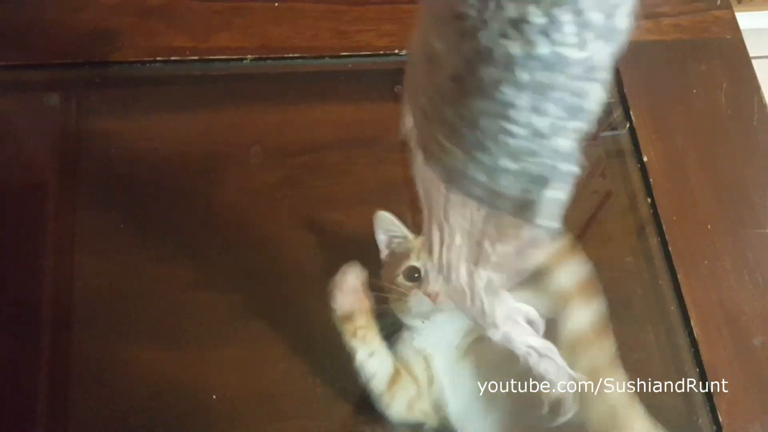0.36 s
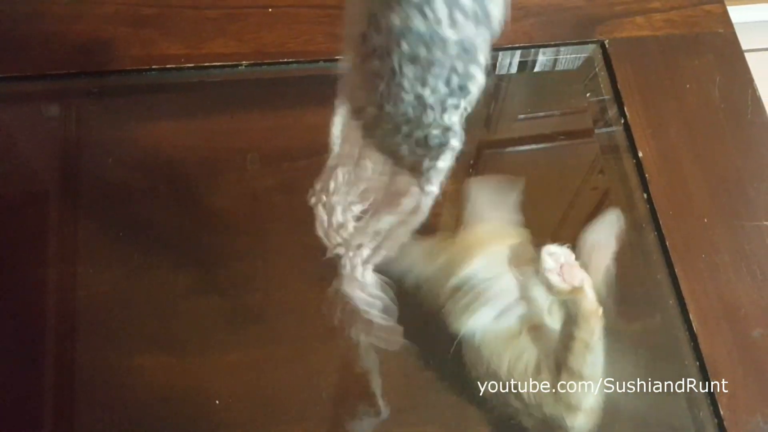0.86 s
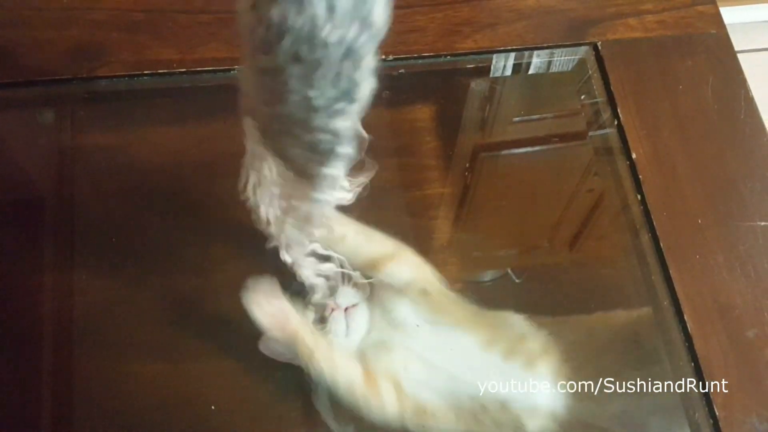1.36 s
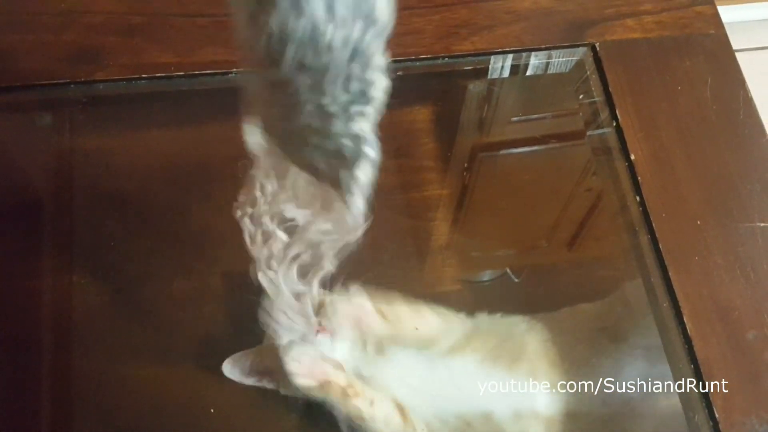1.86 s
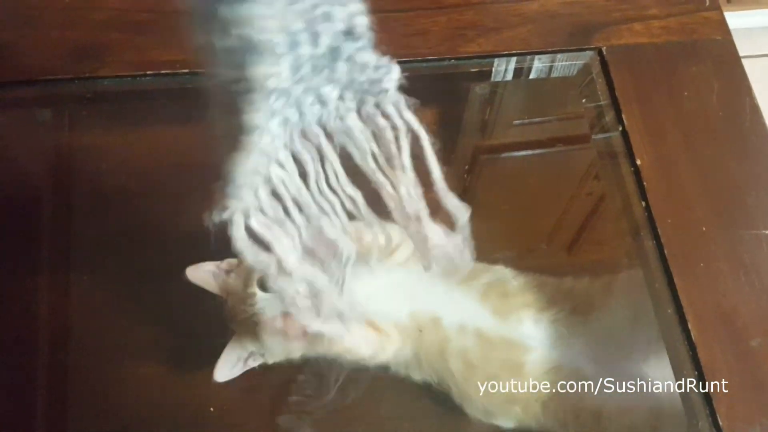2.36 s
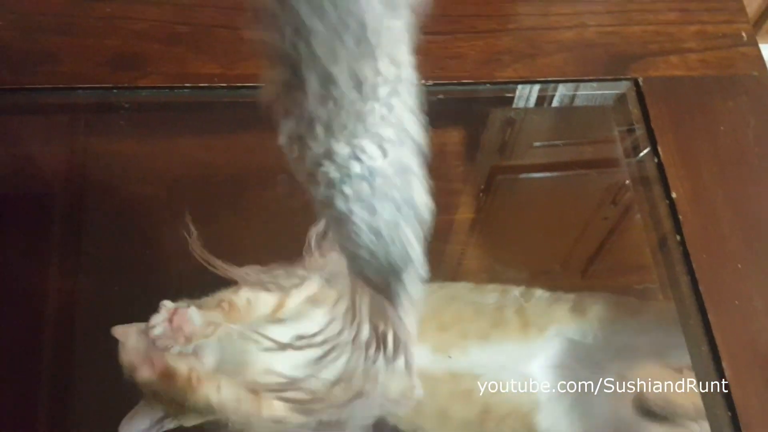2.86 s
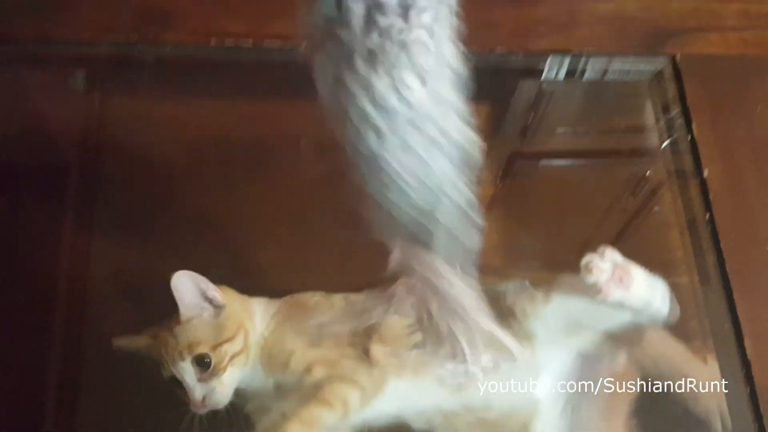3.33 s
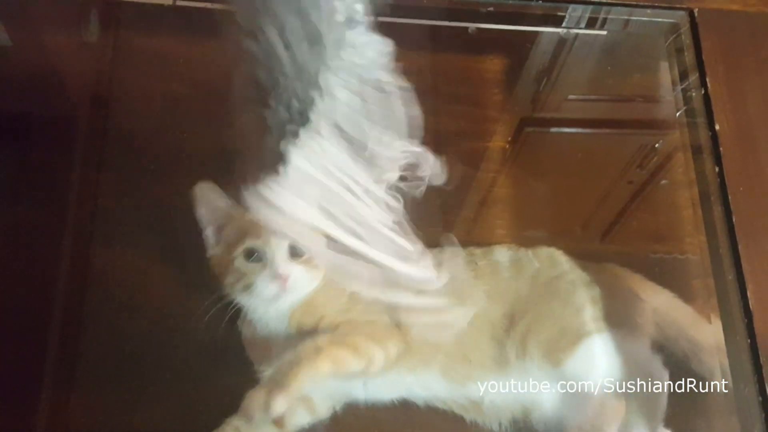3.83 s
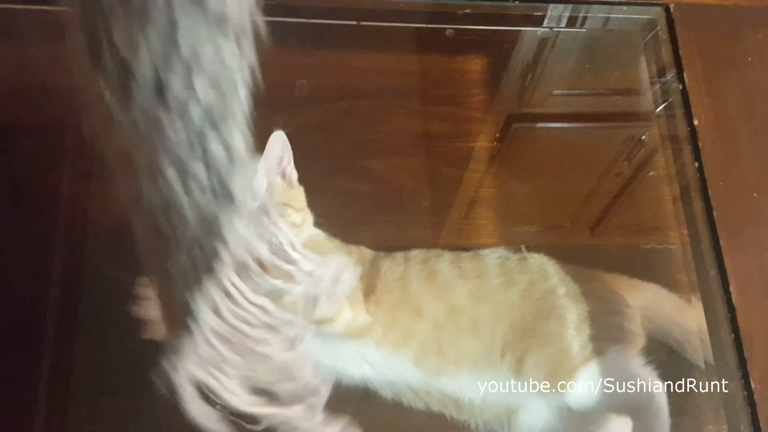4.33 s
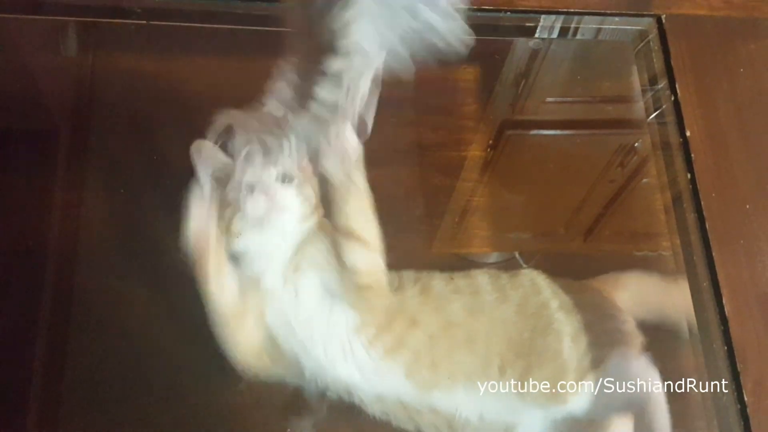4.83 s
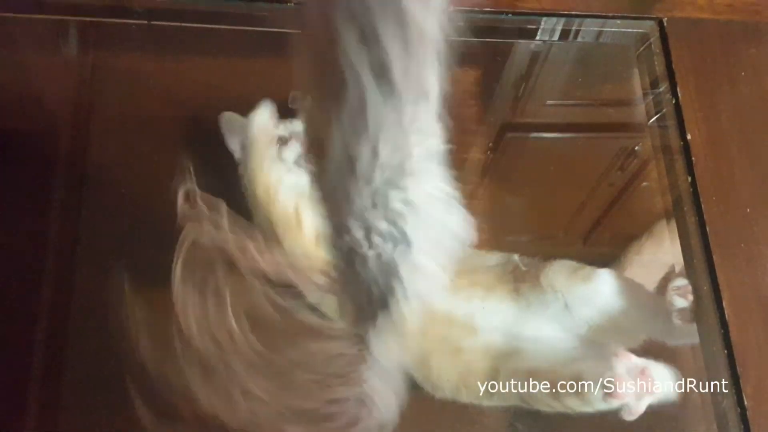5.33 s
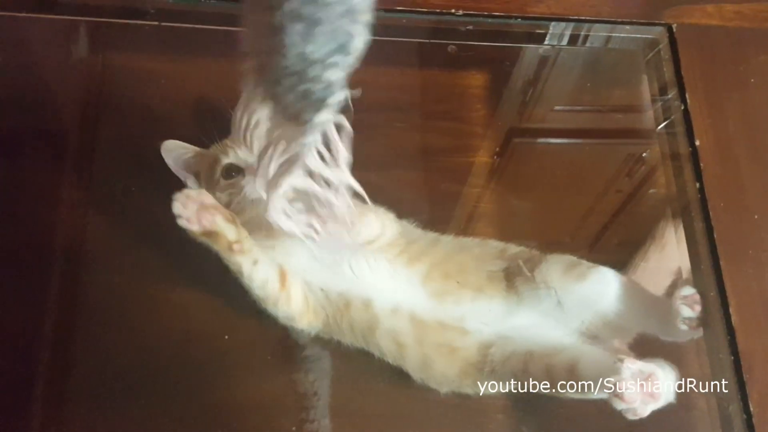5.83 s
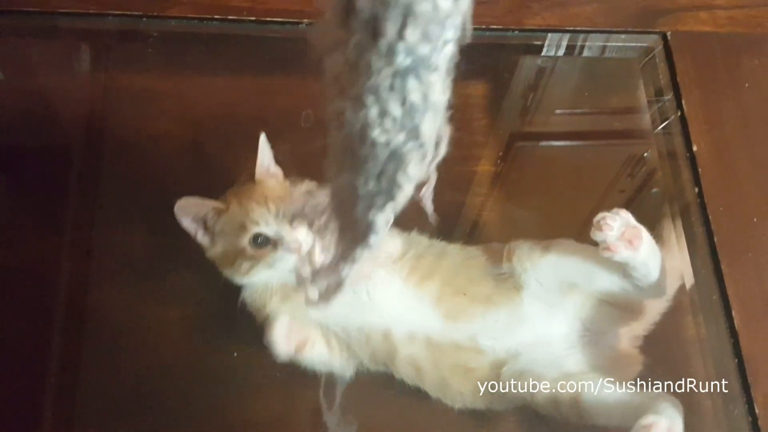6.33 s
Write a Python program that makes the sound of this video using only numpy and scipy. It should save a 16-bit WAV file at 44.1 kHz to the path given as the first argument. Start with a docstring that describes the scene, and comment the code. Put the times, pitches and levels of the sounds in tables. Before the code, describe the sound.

In a quiet indoor room, a kitten's paws and claws play against a wood-framed glass tabletop. Faint taps lead to one loud hollow thump with bright clatter, then a run of lighter knocks, scrapes and fur or wool scuffs. After about two and a half seconds only sparse soft bumps remain over low room hum. A close hand-held stereo microphone adds deep rumble and late dry finger ticks.

```python
"""Kitten paws thump the frame and glass pane of a wooden table: low modes swell, ring and echo briefly. Claws
and pads tap the glass: noise cracks, clattering modes, clear pane rings and a diffuse tail. Fur and wool brush
along as grainy noise, and sliding claws wake short high rings. A quiet room hums behind: coloured noise, a
narrow hum band and hiss. A hand-held recorder with two microphones adds deep handling rumble and, late on, dry
finger ticks and rubs."""
import sys
import numpy as np
from scipy import signal
from scipy.io import wavfile

SR = 44100
rng = np.random.default_rng(int(sys.argv[2]) if len(sys.argv) > 2 else 0)


def rack_gain(trim_db):
    """Turn a fader trim in dB into the linear factor to multiply a signal by."""
    fader = np.asarray(trim_db, float)
    return 10 ** (fader / 20)


def file_out(sig):
    """Save sig as 16-bit WAV at sys.argv[1]."""
    # one column per channel
    cols = np.atleast_2d(sig).T
    # limit, then scale
    lim = np.clip(cols, -1, 1)
    pcm = np.round(lim * 32767).astype(np.int16)
    wavfile.write(sys.argv[1], SR, pcm)


N = 283871   # samples


def rms_one(x):
    """Scale to unit rms."""
    return x / np.sqrt(np.mean(x ** 2) + 1e-20)


def at_hz(points, hz):
    """Read a curve of (frequency [Hz], value) on a log-frequency axis, flat beyond its ends."""
    curve_hz, value = np.transpose(points)
    return np.interp(np.log(hz), np.log(curve_hz), value)


def clicks(s, heights):
    """A train of single-sample pushes."""
    out = np.full(N, 1e-18)
    out[np.round(np.asarray(s) * SR).astype(int)] = heights
    return out


def ring(x, hz, t60):
    """A two-pole resonator: a unit push sets a sine of height 1 ringing, down 60 dB after t60."""
    r, w = rack_gain(-60 / (t60 * SR)), 2 * np.pi * hz / SR
    return signal.lfilter([0, np.sin(w)], [1, -2 * r * np.cos(w), r * r], x)


def dying(x, t60):
    """Each push jumps up and decays 60 dB in t60."""
    return signal.lfilter([1], [1, -rack_gain(-60 / (t60 * SR))], x)


def band(x, low, high):
    """Butterworth band-pass."""
    return signal.sosfilt(signal.butter(2, [low, high], "band", fs=SR, output="sos"), x)


def drift(rate):
    """Slow random wander of unit rms: noise at a fortieth of SR through two poles at rate [Hz]."""
    r = np.exp(-80 * np.pi * rate / SR)
    noise = rng.standard_normal(N // 40 + 2002)
    slow = signal.lfilter([1], [1, -2 * r, r * r], noise)[2000:]   # drop the filter's settling
    return np.interp(np.arange(N) / 40, np.arange(len(slow)), rms_one(slow))


def favour_db(hz, centre_hz, db_per_octave):
    """Level falls (or rises, if negative) per octave away from the pitch the struck spot favours."""
    return -db_per_octave * np.abs(np.log2(hz / centre_hz))


def late_right(pair):
    """The sound reaches the right microphone 0.33 ms later."""
    n = np.arange(N)
    return np.array([pair[0], np.interp(n - 0.00033 * SR, n, pair[1])])


def shadowed(pair, pan_db=-5.5, corner_hz=800):
    """The casing shades the left microphone: above a corner, left against right shifts by pan_db."""
    low = signal.sosfilt(signal.butter(1, corner_hz, fs=SR, output="sos"), pair)
    return low + (pair - low) * rack_gain(np.array([[pan_db], [-pan_db]]) / 2)


def swells(s, rise, fall, db):
    """Each row climbs to its level and dies away, 20 dB per rise or fall time."""
    t, out = np.arange(N) / SR, np.zeros(N)
    for at, up, down, level_db in zip(s, rise, fall, db):
        near = slice(max(int((at - 3 * up) * SR), 0), int((at + 3 * down) * SR))
        away = np.maximum((at - t[near]) / up, (t[near] - at) / down)
        out[near] += rack_gain(level_db - 20 * away)
    return out


EDGES = 21 * 2 ** np.arange(0, 9.7, .4)   # noise band edges [Hz], 0.4 octave apart
HIGH_BANDS = list(zip(EDGES[11:], EDGES[12:]))   # bands above about 440 Hz
# colour of the room noise: (frequency [Hz], relative level [dB per Hz])
ROOM_COLOUR = [(15, -47), (25, -33), (49, -19), (92, -21), (108, 1), (166, -6), (195, -4.5), (242, -3.5),
               (373, -1.5), (607, -13.5), (1070, -13.5), (1290, -21), (2050, -25.5), (6210, -42),
               (16000, -45.5)]
# how alike left and right are, values below 0 played as 0: (frequency [Hz], likeness [-1 to 1])
ROOM_LIKENESS = [(60, 0.58), (180, 0.97), (550, 0.72), (1650, -0.58), (4970, -0.06), (15000, -0.05)]


def room_tone():
    """Distant ventilation and hiss, alike on both sides in the bass, with a wavering hum."""
    noise, white = 0, rng.standard_normal((2, 2, N))
    for k, (low, high) in enumerate(zip(EDGES, EDGES[1:])):
        hz = np.sqrt(low * high)
        mid, side = band(white[k % 2], low, high)
        alike = np.clip(at_hz(ROOM_LIKENESS, hz), 0, 1)
        gain = rack_gain(at_hz(ROOM_COLOUR, hz) + 0.22 * drift(4.8))
        noise = noise + gain * (np.sqrt(1 + alike) * mid + np.sqrt(1 - alike) * side * [[1], [-1]])
    hum_hz, hum_width_hz = 119, 5.5
    hum = band(rng.standard_normal(N), hum_hz - hum_width_hz / 2, hum_hz + hum_width_hz / 2)
    hiss = band(rng.standard_normal((2, N)), 12800, 17400)   # the microphones' own noise peaks high up
    return rack_gain(-50.5) * rms_one(noise) + rack_gain(-62) * rms_one(hum) + rack_gain(-79.5) * rms_one(hiss)


# deep rumble in the casing as the holding hand shifts: (time [s], level [dB])
HAND_RUMBLE = [(0.0, -80), (0.07, -57.5), (0.62, -55), (0.9, -51), (0.95, -54.5), (1.65, -61), (1.66, -58),
               (1.95, -62), (2.0, -47), (2.17, -68), (3.19, -72), (3.26, -52), (3.71, -70), (4.94, -77),
               (5.48, -61), (6.43, -72)]


def hand():
    """Lumpy deep rumble through the casing: low noise with a wandering level, alike on both sides."""
    s, db = np.transpose(HAND_RUMBLE)
    lumps = band(rng.standard_normal(N), 28, 80) * rack_gain(1.5 * drift(8))
    return rack_gain(np.interp(np.arange(N) / SR, s, db)) * rms_one(lumps)


TAP_CHANCE_DB = 1.5   # spread of each band and ring from tap to tap
# claw and pad taps, knock and edge against the tap's own level:
# (time [s], level [dB], dull knock [dB], bright edge [dB], favoured ring [Hz])
CLAW_TAPS = [(0.0114, -43.5, -23, -3, 3400), (0.1792, -43.5, 0, -5, 1030), (0.237, -52, -8, -4, 3630),
             (0.4376, -42, -11, -2, 1940), (0.5704, -45.5, -23, -6, 3300), (0.7455, -37.5, 3, -9, 1450),
             (0.7674, -21, -7, -6.5, 1190), (0.836, -22, 12, -5.5, 1600), (0.9185, -24, -22, -31, 2480),
             (0.972, -39, -25, -4, 2580), (1.06, -39, -12, -14.5, 2330), (1.0925, -21.5, -18.5, -15, 1920),
             (1.2393, -32.5, 9.5, -10, 2750), (1.2702, -32, -26, -15, 1060), (1.4232, -25.5, -14, -8, 1040),
             (1.4325, -33.5, 0, -17, 1040), (1.5868, -30, -9, -7.5, 2340), (1.614, -44.5, -12, -6, 2370),
             (1.6769, -25.5, 2.5, -11.5, 1770), (1.6859, -41.5, 6.5, -31, 1030),
             (1.9968, -26, -6.5, -13, 2180), (2.085, -34, 0, -7, 1930), (2.137, -34, -7.5, -33, 1010),
             (2.377, -36, -10, -13.5, 2850), (2.74, -45, -2.5, -9, 970), (3.233, -54, -6, -2, 1070),
             (4.1758, -46, 5, -25, 1780), (4.352, -41, 0, -21, 1390), (4.9065, -41, 0, -4.5, 1860),
             (5.4212, -40.5, 2, -11, 2750), (5.679, -71, -3, -19, 1500)]
# where the knock, main, edge and treble levels of a tap apply: (frequency [Hz])
TAP_COLOUR_HZ = [750, 2000, 4700, 9000]


def tap_colour_db(hz):
    """Level of every tap at one pitch: its colour, less the distance from the ring its spot favours."""
    _, db, dull_db, edge_db, ring_hz = np.transpose(CLAW_TAPS)
    treble_db = edge_db + 4.1
    levels = db[:, None] + np.transpose([dull_db, 0 * db, edge_db, treble_db])
    colour = [at_hz(np.transpose([TAP_COLOUR_HZ, row]), hz) for row in levels]
    return np.array(colour) + favour_db(hz, ring_hz, 5.4)


# decay of the diffuse tap tail: (frequency [Hz], t60 [s])
TAIL_T60 = [(500, 0.65), (1500, 0.32), (4000, 0.35), (8000, 0.14), (15000, 0.16)]


def crack_and_tail(s):
    """Banded noise: a crack of a few ms, alike on both sides, and a longer tail of its own on each."""
    crack, tail = rng.standard_normal((2, N)), rng.standard_normal((2, 2, N))
    direct, diffuse = 0, 0
    for k, (low, high) in enumerate(HIGH_BANDS):
        hz = np.sqrt(low * high)
        luck_db = TAP_CHANCE_DB * rng.standard_normal(len(s))
        push = clicks(s, rack_gain(tap_colour_db(hz) - 0.74 * np.log2(hz / 2000) + luck_db))
        burst = dying(push, 0.0067 * (2000 / hz) ** 0.053) * crack[k % 2]
        direct = direct + band(rack_gain(12.5) * burst, low, high)
        direct = direct + band(rack_gain(-9) * push, low, high)   # the sharp edge of first contact
        wash = dying(push, at_hz(TAIL_T60, hz)) * tail[k % 2]
        diffuse = diffuse + band(rack_gain(-1.5) * wash, low, high)
    return direct, diffuse


# clear rings of the pane: (frequency [Hz], relative level [dB], t60 [s])
PANE_RINGS = [(1042, 7, 0.15), (1133, 4, 0.29), (1390, -1.5, 0.37), (1800, -1, 0.11), (1930, -7, 0.2),
              (2324, -1, 0.14), (2450, -7, 0.21), (2750, -0.5, 0.15), (4020, 10, 0.06), (4710, 20, 0.048)]


def pane_rings(s, ring_hz):
    """The glass sings at its clear modes, most at the favoured ring of each tap and its octave."""
    out = 0
    for hz, mode_db, t60 in PANE_RINGS:
        near_db = np.maximum(favour_db(hz, ring_hz, 26), favour_db(hz, 2 * ring_hz, 28))
        luck_db = TAP_CHANCE_DB * rng.standard_normal(len(s))
        level_db = tap_colour_db(hz) + mode_db - 7.5 + near_db + luck_db
        out = out + ring(clicks(s, rack_gain(level_db)), hz, t60)
    return out


def clatter(s, count=48):
    """Close modes, each reaching each microphone with its own size and sign."""
    out = 0
    for hz in np.geomspace(480, 7000, count) * rng.uniform(1.0, 1.02, count):
        swing = rng.standard_normal((2, len(s)))
        push = np.array([clicks(s, rack_gain(tap_colour_db(hz) - 13.5) * side) for side in swing])
        out = out + ring(push, hz, 0.31 * at_hz(TAIL_T60, hz))
    return out


def taps():
    """Hard contacts on glass: a short crack, clattering modes, clear rings and a diffuse tail."""
    s, *_, ring_hz = np.transpose(CLAW_TAPS)
    crack, tail = crack_and_tail(s)
    direct = crack + pane_rings(s, ring_hz)
    return shadowed(late_right([direct, direct]) + tail + clatter(s))


# soft paw blows; the fall is per octave away from the favoured pitch, the ring time scales the modes' t60:
# (time [s], level [dB], favoured pitch [Hz], fall [dB per octave], ring time [times])
PAW_BLOWS = [(0.038, -27.5, 215, 20.5, 1.07), (0.249, -38.5, 230, 16, 1.8), (.44, -45, 131, 0.5, 2.8),
             (0.767, -27.5, 312, 6, 1.3), (0.8345, -3, 235, 11.5, 0.68), (.852, -13, 560, 28, 1.4),
             (.866, -7, 160, 9.5, 0.55), (.895, -13, 239, 8, 0.19), (.918, -19.5, 142, 5, 0.78),
             (1.013, -26.5, 170, 12.5, 0.55), (1.089, -34, 125, 2.5, 1.27), (1.233, -36.5, 235, 11.5, 2.9),
             (1.423, -33, 402, 35, 1.7), (1.461, -31.5, 121, 9, 1.26), (1.579, -30.5, 204, 16, 1),
             (1.673, -29.5, 211, 11.5, 1.43), (1.996, -36, 308, 4, 0.98), (2.028, -37, 119, 18, 1.6),
             (2.087, -37.5, 231, 15, 3.2), (2.14, -38, 120, 11, 0.82), (2.378, -67.5, 400, -13, 0.92),
             (2.742, -44, 129, 15, 1.2), (3.237, -37.5, 160, 19, 2.8), (3.308, -35.5, 120, 13, 1.6),
             (3.392, -38.5, 121, 20, 0.8), (4.905, -45, 300, 2, 0.45), (5.4, -41.5, 150, 7, 0.73)]
# low modes of pane and frame: (frequency [Hz], relative level [dB], t60 [s])
TABLE_MODES = [(91.7, -6, 0.39), (118.8, 4.5, 0.31), (160, 1.5, 0.31), (167, -20.5, 0.31),
               (195.6, -12.5, 0.57), (226.94, -1.5, 0.33), (242.2, -0.5, 0.18), (286, -20.5, 0.49),
               (300.2, -3, 0.16), (315.3, 1, 0.12), (354.2, 3, 0.11), (393, -7.5, 0.15), (402, 4, .18),
               (433, -4, 0.34), (492, -6.5, 0.23), (571, -6.5, 0.1), (606, -6.5, 0.15), (678, -7.5, 0.3),
               (702, -14.5, 0.16), (885, -1, 0.17)]


def thumps():
    """A soft pad drives the low modes; the heavy frame is slow to follow, so the deepest swell late."""
    hz, mode_db, t60 = np.transpose(TABLE_MODES)[:, :, None]
    t, out = np.arange(SR // 2) / SR, np.zeros(N + SR)
    swell = 1 - np.exp(-t / (0.0082 * (120 / hz) ** 2))   # 8.2 ms at 120 Hz
    chance_db = rng.standard_normal((len(PAW_BLOWS), len(TABLE_MODES), 1))
    for (s, db, spot_hz, fall_db, ring_times), luck_db in zip(PAW_BLOWS, chance_db):
        start_db = db + mode_db - 4 + favour_db(hz, spot_hz, fall_db) + luck_db
        level_db = start_db - 60 * t / (ring_times * t60)
        at = round(s * SR)
        out[at:at + len(t)] += np.sum(swell * rack_gain(level_db) * np.sin(2 * np.pi * hz * t), axis=0)
    soft = signal.lfilter([.15], [1, -.85], out[:N])
    # a small pane radiates no deep bass
    return signal.sosfilt(signal.butter(4, 88, "high", fs=SR, output="sos"), soft)


def echoes(x, t60=0.17, wall_hz=900):
    """Room echoes: six feedback delays a side, duller on every round."""
    out, dull = np.zeros((2, N)), np.exp(-2 * np.pi * wall_hz / SR)
    for k, lag in enumerate((rng.uniform(0.021, 0.025, 12) * SR).astype(int)):
        loop, gain, state = x.copy(), rack_gain(-60 * lag / SR / t60), [0.]
        for i in range(lag, N, lag):
            back, state = signal.lfilter([gain * (1 - dull)], [1, -dull], loop[i - lag:i], zi=state)
            loop[i:i + lag] += back[:N - i]
        out[k % 2] += (loop - x) * (-1) ** (k // 2)
    return out


# rings woken by a sliding claw: (frequency [Hz], relative level [dB], t60 [s])
SCRAPE_RINGS = [(3860, -3.5, 0.02), (4580, 5.5, 0.01), (5010, -5, 0.031), (5420, -10, 0.016),
                (6230, -5.5, 0.02)]
# a claw sliding on the pane: (firmest time [s], rise [s], fall [s], level [dB])
CLAW_SLIDES = [(0.26, 0.088, .05, -53.5), (0.438, 0.0077, 0.11, -57), (0.564, 0.11, 0.083, -61.5),
               (1.085, .1, .012, -64), (1.228, 0.028, .07, -48.5), (1.435, 0.038, .022, -38.5),
               (1.503, .027, 0.074, -39.5), (1.898, .2, 0.24, -68.5), (2.146, .045, 0.078, -62),
               (2.748, 0.035, 0.053, -64), (4.915, .006, 0.045, -80)]


def claw_slides(grains):
    """A claw dragged on glass: grains excite short high rings under each slide."""
    rings = sum(rack_gain(db) * ring(grains[1, 1:], hz, t60) for hz, db, t60 in SCRAPE_RINGS)
    return swells(*np.transpose(CLAW_SLIDES)) * rms_one(rings)


def brush_noise(grains, colour):
    """Grains coloured band by band, each band wavering, part shared and part each side's own."""
    out = 0
    for k, (low, high) in enumerate(HIGH_BANDS):
        shared, *own = band(grains[k % 2], low, high)
        gain = rack_gain(at_hz(colour, np.sqrt(low * high)) + 2.34 * drift(9.8))
        out = out + gain * (shared + 1.9 * np.array(own))
    return rms_one(out)


# fur and wool brushing the pane, one stroke a row; the last two, from 5.99 s, are fingers rubbing the recorder:
# # (firmest time [s], rise [s], fall [s], body level [dB], hiss level [dB])
BRUSH_STROKES = [(0.26, 0.16, 0.19, -53, -64), (0.425, 0.09, .02, -83, -60),
                 (0.438, 0.0037, 0.11, -43, -50.5), (0.564, 0.042, 0.056, -62, -53),
                 (0.654, 0.011, 0.052, -77, -48), (0.735, 0.2, 0.016, -63.5, -80),
                 (1.05, 0.32, 0.26, -55, -63), (1.237, 0.03, 0.093, -42, -54),
                 (1.436, 0.041, 0.013, -39.5, -46.5), (1.492, 0.066, 0.083, -45, -50),
                 (1.806, 0.022, 0.024, -57, -67), (1.898, 0.22, 0.25, -69, -74),
                 (2.146, 0.068, 0.11, -50.5, -62), (2.31, 0.044, 0.048, -56.5, -59.5),
                 (2.747, 0.013, 0.088, -51.5, -63), (2.828, 0.023, 0.091, -57.5, -64.5),
                 (3.005, 0.077, 0.12, -65.5, -62), (3.6, 0.11, 0.7, -70, -77),
                 (3.87, 0.51, 0.073, -77, -68.5), (4.182, 0.018, .025, -59, -69.5),
                 (4.352, 0.012, 0.092, -60, -68), (4.921, 0.0088, 0.061, -49, -60),
                 (5.092, .02, 0.076, -69, -74), (5.999, .006, 0.026, -60, -56),
                 (6.061, 0.061, 0.0046, -68, -57)]
# colour of the body of a stroke: (frequency [Hz], relative level [dB per Hz])
BODY_COLOUR = [(500, 5), (1500, 2.5), (3000, 5.5), (4000, -6), (6000, -5), (8000, -61)]
# colour of the hiss of a stroke: (frequency [Hz], relative level [dB per Hz])
HISS_COLOUR = [(3000, -10), (6000, -10), (9000, -10), (13000, -5), (16000, -18)]


def brushing():
    """Fibres catch and slip: dense uneven grains under each stroke, patchy in pitch, wake the pane. The last
    strokes, from 5.99 s, are fingers rubbing the recorder."""
    *shape, body_db, hiss_db = np.transpose(BRUSH_STROKES)
    body, hiss = swells(*shape, body_db), swells(*shape, hiss_db)
    grain_db = 4.2 * np.minimum(rng.exponential(1, N), 6) + 2.2 * drift(80)
    grains = rng.standard_normal((2, 3, N)) * rack_gain(grain_db)   # two sets of (shared, left, right)
    out = claw_slides(grains)
    out = out + body * brush_noise(grains, BODY_COLOUR) + hiss * brush_noise(grains, HISS_COLOUR)
    slips = rms_one(grains[0, 1:]) * body
    rings = sum(ring(slips * rack_gain(at_hz(BODY_COLOUR, hz) - 41.5), hz, t60) for hz, _, t60 in PANE_RINGS)
    return shadowed(late_right(out + rings))


# fingers on the recorder:
# (time [s], snap level [dB], left minus right [dB], upper edge [Hz], dull push level [dB])
FINGER_TICKS = [(5.963, -43, -7, 6000, -57), (5.9968, -32, -11, 13900, -48),
                (6.0082, -28.5, -24, 15500, -41), (6.0568, -40, -26, 15000, -39),
                (6.127, -44, 12, 6870, -44)]


def ticks():
    """Dry wide-band snaps of the casing: one sharp edge, a brief rattle and a dull push."""
    t, out = np.arange(SR // 50) / SR, np.zeros((2, N))
    for s, db, pan_db, top_hz, push_db in FINGER_TICKS:
        rattle = .12 * rack_gain(-60 * t / .005) * rng.standard_normal(len(t))   # t60 5 ms
        snap = band(rack_gain(db) * ((t == 0) + rattle), 440, min(top_hz, 16000))
        push = rack_gain(push_db - 60 * t / 0.0071) * np.cos(2 * np.pi * 600 * t)   # 600 Hz, t60 7.1 ms
        at = round(s * SR)
        out[:, at:at + len(t)] = push + snap * rack_gain(np.array([[pan_db], [-pan_db]]) / 2)
    return out


def scene():
    """All sources at the two microphones; the thumps alone are echoed."""
    low = thumps()
    # bass arrives alike on both sides, so the echoes lose theirs
    room = signal.sosfilt(signal.butter(2, 300, "high", fs=SR, output="sos"), echoes(low))
    return low + rack_gain(-7.0) * room + taps() + brushing() + ticks() + room_tone() + hand()


def top_cut(x):
    """Nothing passes above 16.65 kHz."""
    return signal.sosfilt(signal.butter(12, 16650, fs=SR, output="sos"), x)


def record(dry):
    """Peaks are rounded, the top is cut at 16 kHz and a small constant offset is added."""
    rounded = 0.95 * np.tanh(dry / 0.93)
    cut = signal.sosfilt(signal.cheby2(10, 25, 16000, fs=SR, output="sos"), rounded)
    return top_cut(cut - .0006)


dry = scene()
out = record(dry)
file_out(out)
```